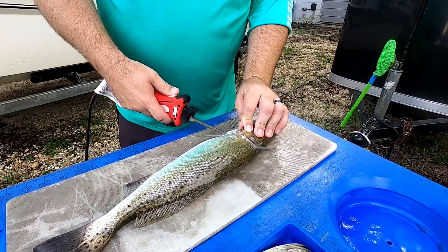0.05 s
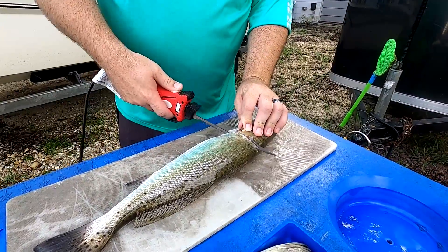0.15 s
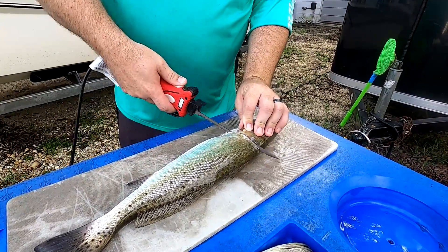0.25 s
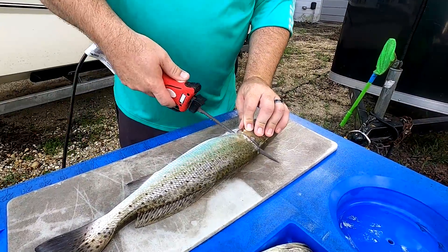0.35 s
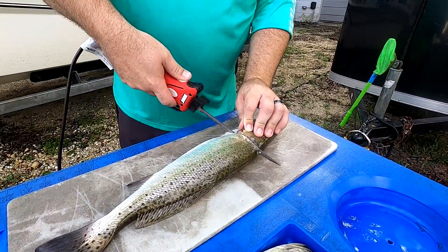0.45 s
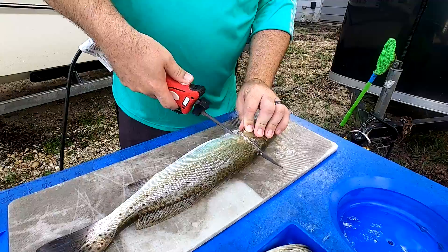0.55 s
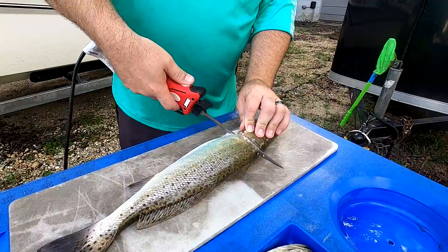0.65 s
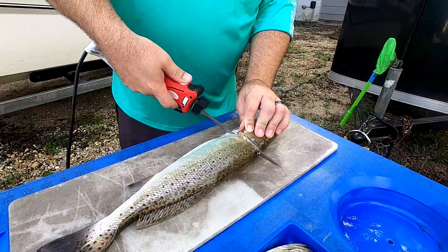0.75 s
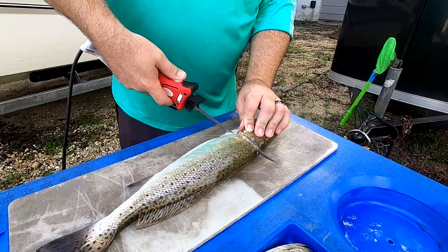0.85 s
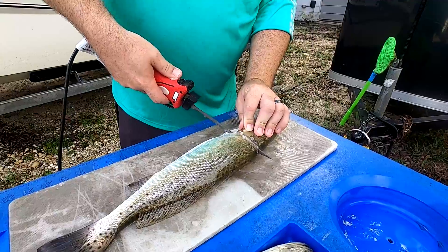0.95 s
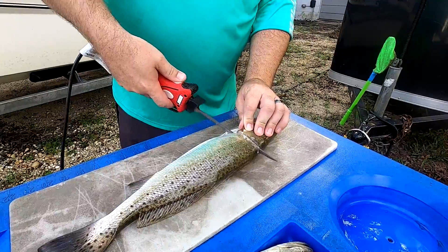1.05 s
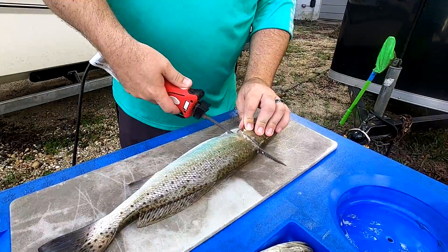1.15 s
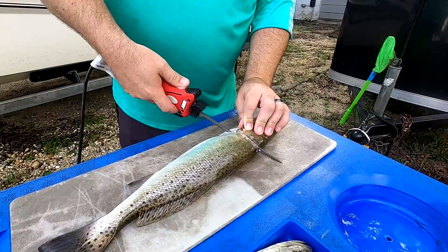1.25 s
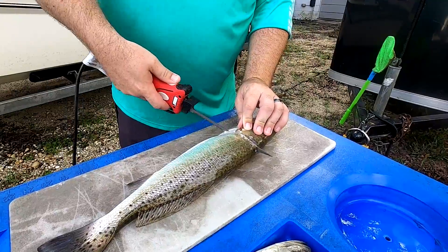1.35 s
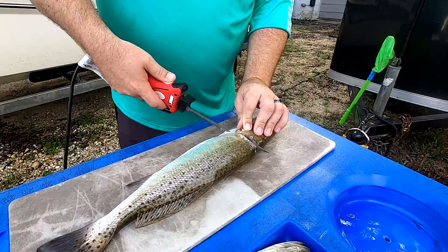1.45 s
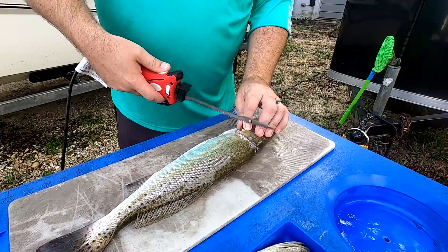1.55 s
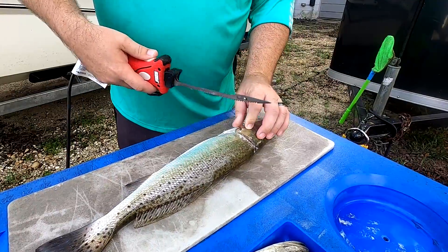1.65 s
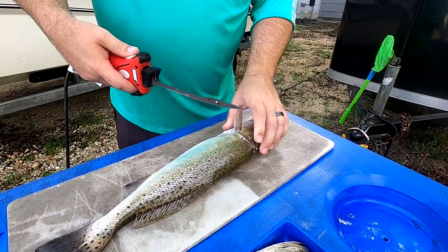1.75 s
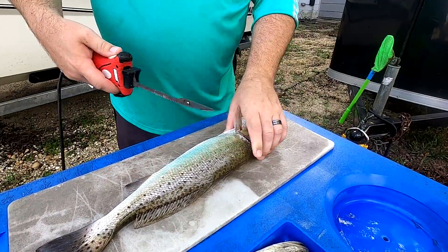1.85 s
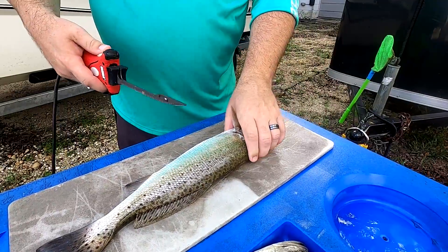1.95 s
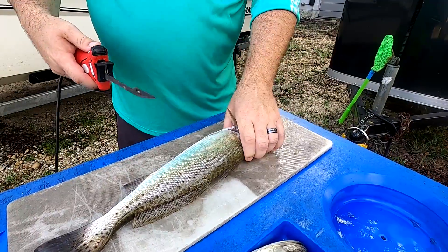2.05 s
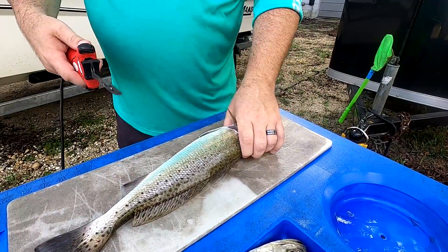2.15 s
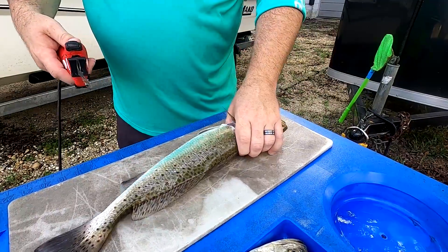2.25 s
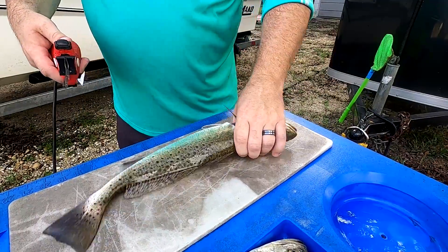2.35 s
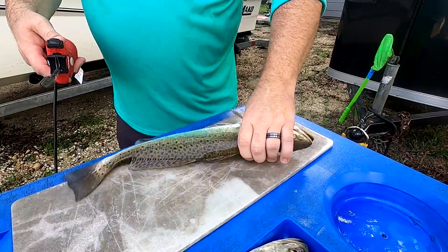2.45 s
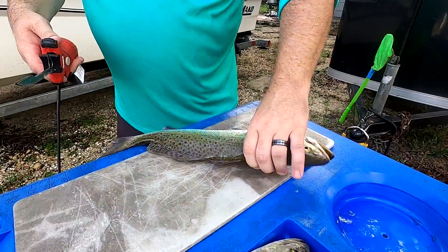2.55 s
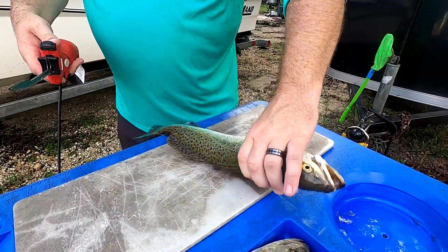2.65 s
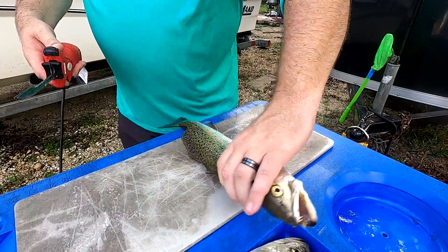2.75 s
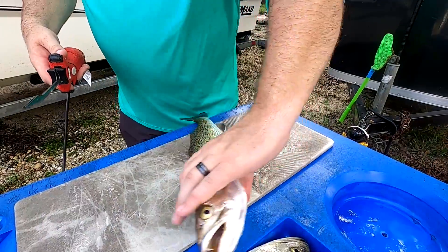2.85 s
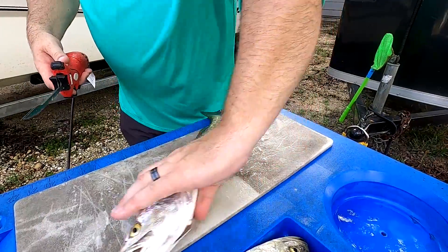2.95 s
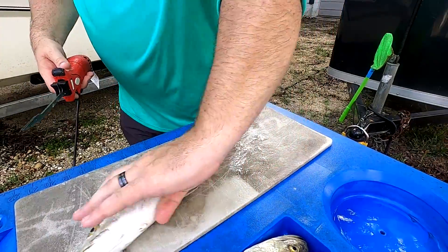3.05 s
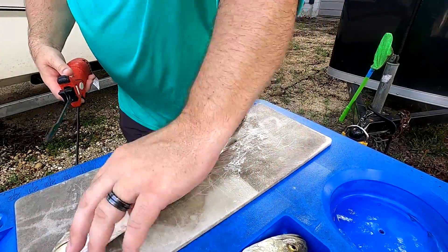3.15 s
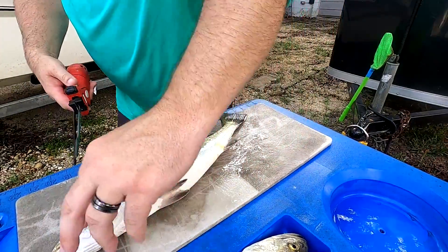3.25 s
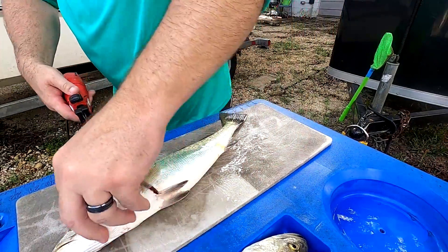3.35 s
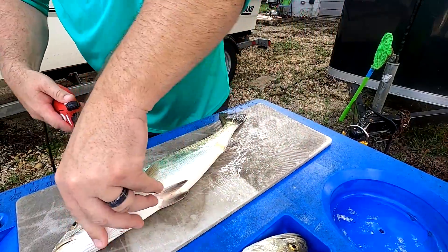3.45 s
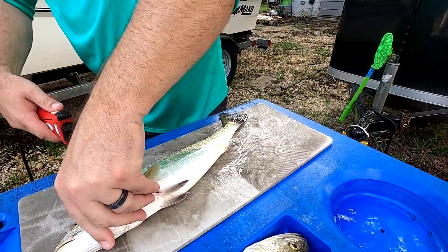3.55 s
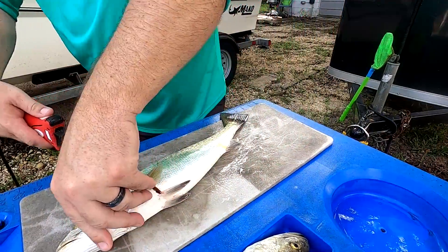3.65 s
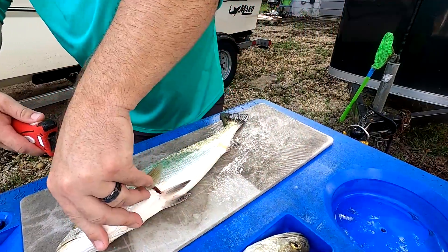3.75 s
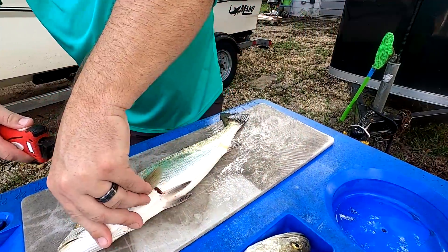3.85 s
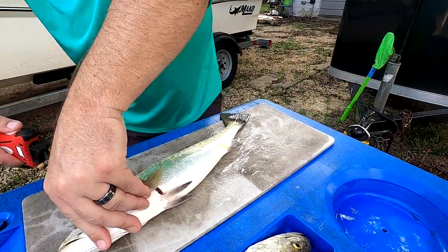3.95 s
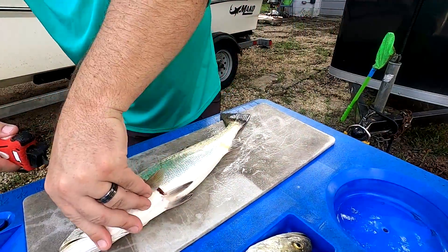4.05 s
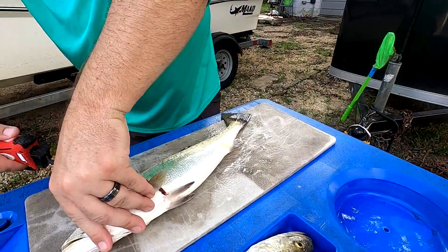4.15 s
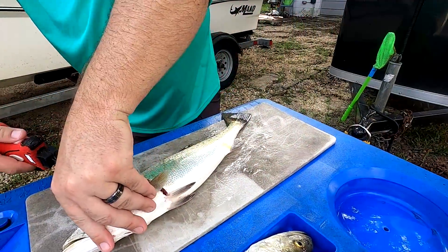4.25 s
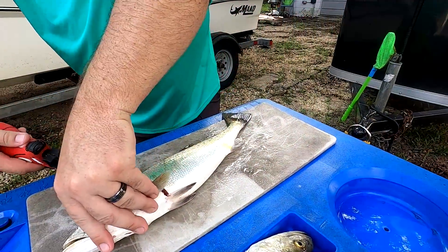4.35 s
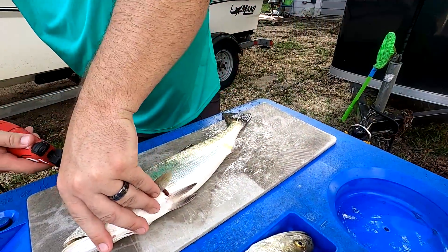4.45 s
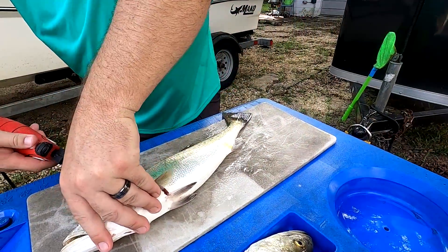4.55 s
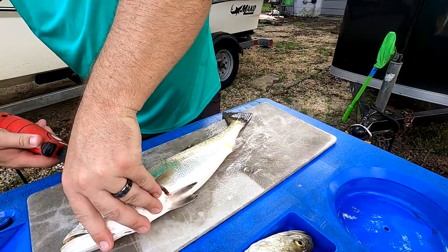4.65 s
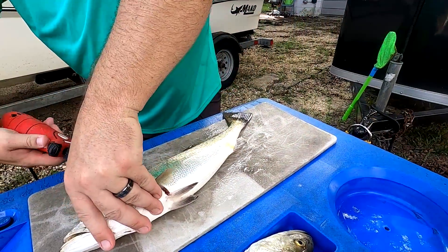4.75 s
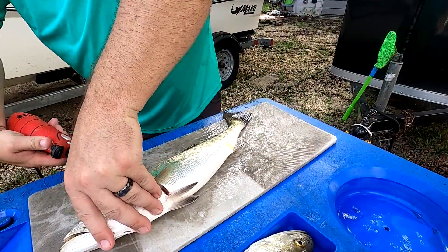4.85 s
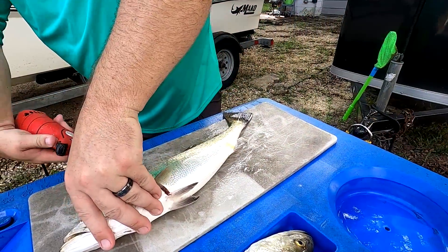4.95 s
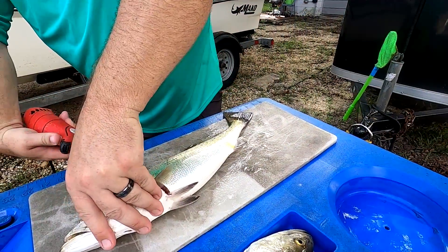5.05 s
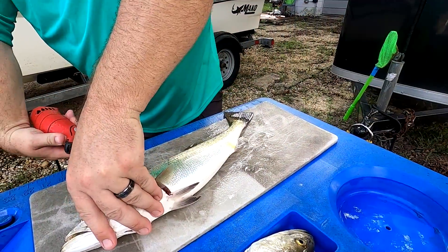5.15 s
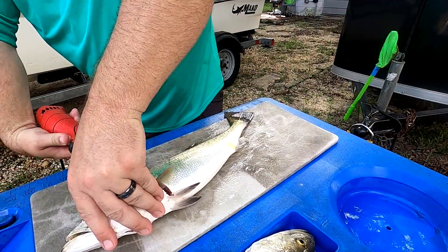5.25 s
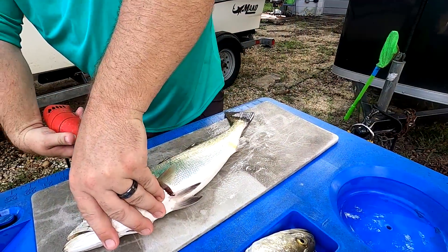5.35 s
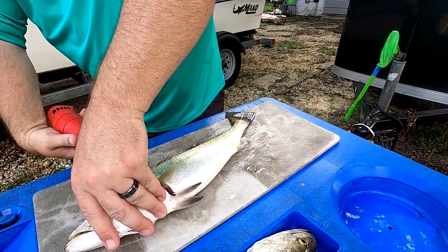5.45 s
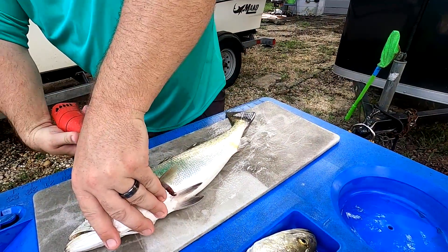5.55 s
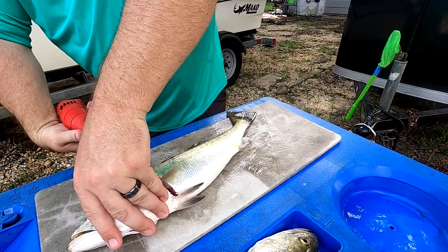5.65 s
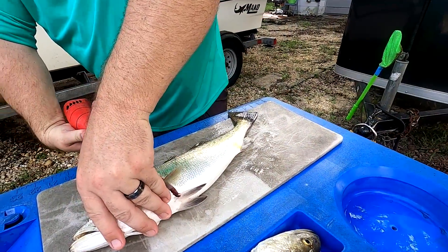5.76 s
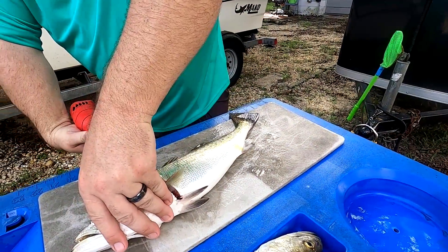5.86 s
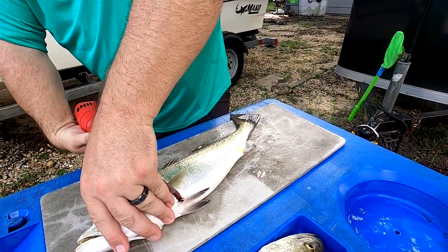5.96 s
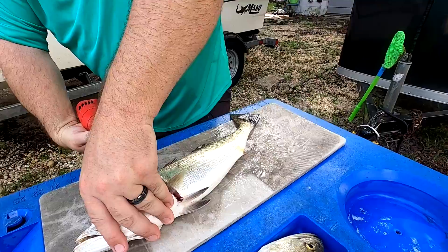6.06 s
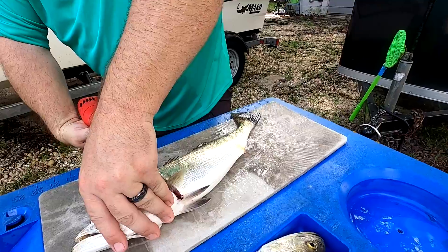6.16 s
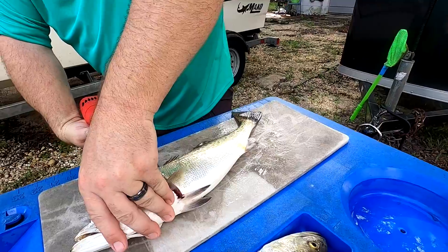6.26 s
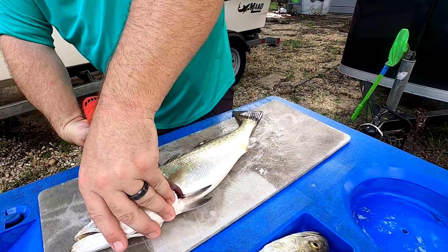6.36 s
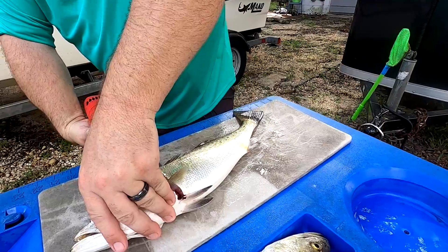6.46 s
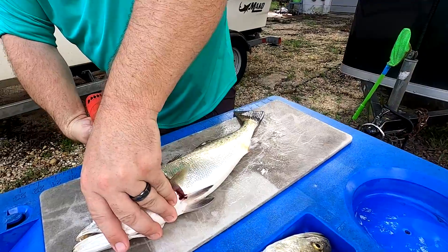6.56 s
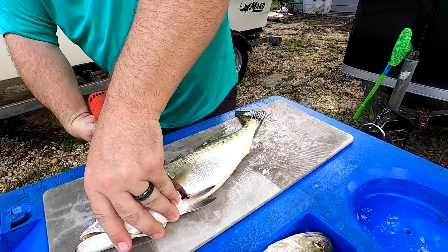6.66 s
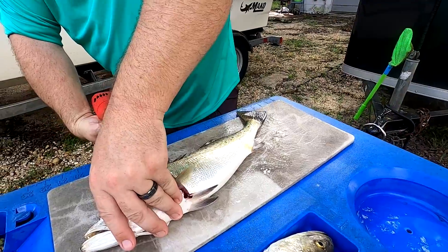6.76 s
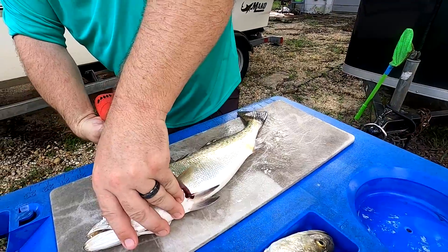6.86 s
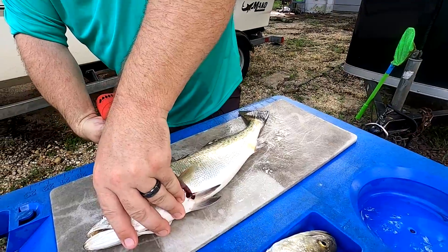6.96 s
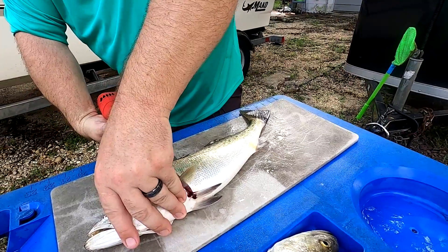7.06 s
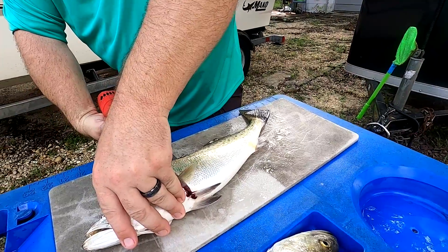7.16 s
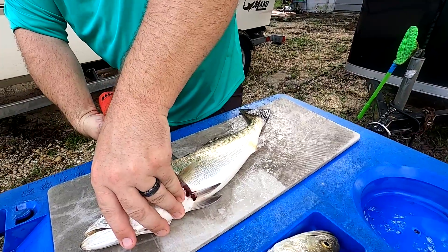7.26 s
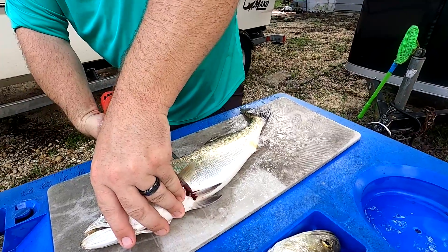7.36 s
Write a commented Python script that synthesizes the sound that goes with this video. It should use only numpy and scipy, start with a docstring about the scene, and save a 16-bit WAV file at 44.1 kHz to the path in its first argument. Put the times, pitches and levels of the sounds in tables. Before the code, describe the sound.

Buzzing electric knife cuts outdoors, winds down to separate clicks, a soft wet thud follows in light wind, then the buzz snaps back on.

```python
"""Outdoors, an electric fillet knife runs over a board, in light wind with a far wash behind it.
A motor whines through a gear and crank that shuttles two blades; they rattle, scrape and clack.
It cuts, coasts to a stop with slowing clacks, the fish is turned and flops on the board, then it restarts.
Gear and crank sounds follow one speed curve; clacks and thuds are dying tones; wind and wash are shaped noise.
A small stereo camera listens."""
import sys
import numpy as np
from scipy import signal
from scipy.fft import rfft, irfft
from scipy.io import wavfile
from scipy.ndimage import uniform_filter1d

SR = 44100
rng = np.random.default_rng(int(sys.argv[2]) if len(sys.argv) > 2 else 0)


def put_to_file(sound):
    """Save the sound as 16-bit audio at rate SR, in the file named by the first command-line argument."""
    columns = np.atleast_2d(sound).T  # one column per channel
    safe = np.clip(columns, -1, 1)
    whole_steps = np.round(safe * 32767)
    wavfile.write(sys.argv[1], SR, whole_steps.astype(np.int16))


def boost(x):
    """Linear amplitude factor 10**(x/20) for a level x in decibels (scalar or array-like)."""
    u = np.asarray(x, float) / 20
    return 10 ** u


N = 326779
T = np.arange(N) / SR


def evened(x):
    """Scales a sound to rms 1."""
    return x / np.sqrt(np.mean(x ** 2) + 1e-20)


def smooth_noise(size, *spans):
    """Slowly wandering noise of rms 1, averaged over each span of samples in turn."""
    x = rng.standard_normal(size)
    for span in spans:
        x = uniform_filter1d(x, span)
    return evened(x)


def read(points, hz):
    """Reads a table of pitches and values, evenly by octave."""
    f, value = np.transpose(points)
    return np.interp(np.log(hz + 1), np.log(f + 1), value)


def follow(points, t):
    """Reads each column of a table of times and values."""
    s, *columns = np.transpose(points)
    return [np.interp(t, s, column) for column in columns]


def colour(x, points, lo_hz=0, hi_hz=SR):
    """Filters with the given spectrum, faded outside lo-hi; nothing sounds before its cause."""
    hz = np.abs(np.fft.fftfreq(8192, 1 / SR)) + 1
    gain = boost(read(points, hz)) / np.sqrt((1 + (lo_hz / hz) ** 8) * (1 + (hz / hi_hz) ** 8))
    log = np.log(gain + 1e-5)
    taps = np.fft.ifft(np.exp(log - 1j * signal.hilbert(log).imag)).real[:4096]
    rows = signal.oaconvolve(np.atleast_2d(x), taps[None] / np.linalg.norm(taps), axes=1)
    return rows[:, :x.shape[-1]].reshape(x.shape)


def ring(hz, t60, size=3000):
    """One dying tone, 60 dB down after t60 seconds."""
    t = np.arange(size) / SR
    return boost(-60 * t / t60) * np.sin(2 * np.pi * hz * t)


def linger(x, decay_s):
    """Lets each impulse die away exponentially."""
    return signal.lfilter([1], [1, -np.exp(-1 / SR / decay_s)], x)


def swells(t, rest_db, rows):
    """A resting gain with bell-shaped swells on it."""
    return boost(rest_db) + sum(boost(db) * np.exp(-((t - s) / width) ** 2) for s, db, width in rows)


def add(mix, s, sound, pan_db=0):
    """Places a one-channel sound in the stereo mix; pan is left minus right."""
    part = mix[:, round(s * SR):][:, :len(sound)]
    part += boost([[pan_db / 2], [-pan_db / 2]]) * sound[:part.shape[1]]


# colour of the wind noise: pitch_hz, level_db (per Hz)
WIND_COLOUR = [(7.1, -29.5), (12, -6.5), (28, 5.5), (48, 7), (70, 7.5), (90, -8), (123, -2.5), (156, -9),
               (200, -15.5), (260, -49.5), (440, -120)]
# gusts at the microphone ports: peak_s, level_db, width_s
GUSTS = [(.47, -54, 0.022), (1.48, -50, 0.022), (1.96, -46, 0.025), (2.37, -45.5, 0.05),
         (2.62, -54.5, 0.028), (3.161, -46, 0.058), (3.61, -49, 0.014), (4.79, -59, 0.024),
         (5.1, -69, 0.02), (5.29, -52, 0.24), (5.66, -50, 0.026), (6.5, -63, 0.03), (6.69, -55, 0.021),
         (7.08, -43, 0.023), (7.35, -50, 0.035)]
# one deep gust: peak_s, peak_db, pitch_hz, width_s, left_minus_right_db
DEEP_GUST = (7.034, -24, 19, .032, -7)
BREEZE_DB, LUMPS_DB = -57, -0.5  # wind between the gusts, and how much it wanders


def wind():
    """Wind buffets the ports: low noise whose level wanders and swells, nearly alike in both ears."""
    shared, unlike = rng.standard_normal((2, N))
    lumps_db = LUMPS_DB * smooth_noise(N, 2500, 2500)
    noise = colour(shared + np.outer([.16, -.16], unlike), WIND_COLOUR)
    at, peak_db, hz, width, pan_db = DEEP_GUST
    bell = np.exp(-((T - at) / width) ** 2)
    gust = bell * -np.cos(2 * np.pi * hz * (T - at))
    return swells(T, BREEZE_DB + lumps_db, GUSTS) * noise + boost(peak_db + np.outer([.5, -.5], pan_db)) * gust


# colour of the far wash: pitch_hz, level_db (per Hz)
YARD = [(53, -16.5), (90, -3), (147, -8.5), (236, -8.5), (314, -12.5), (401, -13.5), (502, -22.5),
        (838, -22.5), (1460, -21), (3040, -35.5), (5290, -42), (12000, -64), (15600, -102), (22000, -120)]
YARD_DB = -58.5


def yard():
    """The far wash of the yard: steady shaped noise, slightly different in each ear."""
    shared, unlike = rng.standard_normal((2, N))
    return boost(YARD_DB) * np.array([colour(shared + side * 0.2 * unlike, YARD) for side in (1, -1)])


# stereo balance of wind and yard: pitch_hz, left_minus_right_db
TILT = [(60, -0.5), (240, -1), (950, 1.5), (3770, 5), (15000, -19)]


def air():
    """Wind and yard together, with a left-right balance that depends on pitch."""
    tilt = boost(np.outer([.5, -.5], read(TILT, np.fft.rfftfreq(N, 1 / SR))))
    return irfft(rfft(wind() + yard()) * tilt, N)


# speed the motor settles at under load, then coasting; one table a run: time_s, gear_mesh_hz
SPEEDS = [
    [(0.0, 2940), (.17, 2961), (0.3, 2964), (0.5, 2946), (0.62, 2951), (0.8, 2942), (0.92, 2927.5),
     (1.0, 2927.5), (1.224, 2938), (1.28, 2748), (1.63, 1533), (1.7, 1313), (1.8, 1040), (2.04, 500),
     (2.14, 290), (2.33, 100)],
    [(4.395, 2945), (5.0, 2947), (5.3, 2956.5), (5.47, 2947.5), (5.62, 2948), (5.8, 2963.5), (5.92, 2963),
     (6.12, 2948.5), (6.32, 2952.5), (6.48, 2948.5), (6.66, 2933), (6.8, 2936), (7.0, 2945), (7.41, 2941)],
]
# trigger pull, one number a run (the first run is already at speed): trigger_s
TRIGGER_S = [-1, 4.39]
# crank angle at the start, one number a run: angle_turns
CRANK_START = [.045, .038]
CRANK = .012  # crank turns per gear tooth
SPIN_UP_S = .044


def spin(run):
    """Time, mesh rate and crank angle of one run: the motor climbs to its speed after the trigger."""
    s, settled = np.transpose(SPEEDS[run])
    t = np.arange(s[0], min(s[-1], N / SR), 1 / SR)
    hz = np.interp(t, s, settled) * (1 - np.exp(-(t - TRIGGER_S[run]) / SPIN_UP_S))
    return t, hz, CRANK_START[run] + CRANK * np.cumsum(hz) / SR


FULL_HZ = 2950  # gear mesh rate counted as full speed


def octaves_slower(hz):
    """How many octaves the mesh rate lies below full speed."""
    return np.log2(np.maximum(FULL_HZ / hz, 1))


TORQUE_S = 0.014


def torque(t, run):
    """The gears are pressed hard while the motor picks up, then ease off."""
    return np.exp(-(t - TRIGGER_S[run]) / TORQUE_S)


TAKE_UP_S, CATCH_S = .013, 0.0018  # slack before the gears meet; rise of the sound after that


def gears_meet(t, run):
    """Silent until the motor has taken up the slack, then a quick rise."""
    return np.clip((t - TRIGGER_S[run] - TAKE_UP_S) / CATCH_S, 0, 1)


def blows(crank, table, loose):
    """One impulse each time the crank passes a listed angle, loose in time (samples) and size."""
    luck, out = rng.standard_normal((200, len(table), 2)), np.zeros(len(crank))
    for k, (angle, db) in enumerate(table):
        at = np.flatnonzero(np.diff(np.floor(crank - angle)))
        shift = (loose * luck[:len(at), k, 0]).astype(int)
        out[np.clip(at + shift, 0, len(crank) - 1)] = boost(db + 1.6 * luck[:len(at), k, 1])
    return out


# how the hand holds and turns the knife, one table a run:
# time_s, rattle_db, whine_db, whine_left_minus_right_db, whine_left_lead_rad
GRIPS = [
    [(0.0, -27, -32, 4, -.75), (.22, -26, -32.5, 2, -0.86), (.3, -26, -26, -.6, -.63),
     (.4, -24.5, -23, 0, -0.43), (.6, -27, -21, 0.5, -0.53), (.76, -28.5, -20.5, .5, -.5),
     (.94, -26, -21.5, 0, -0.51), (1.07, -26.5, -23.5, .0, -0.38), (1.3, -27.5, -23, 2.5, -0.8),
     (1.7, -25.5, -20.5, 0, -0.1)],
    [(4.415, -23, -40, -5, -0.44), (4.435, -27, -8, 11, -.5), (4.455, -34, -19, 12, -0.69),
     (4.475, -30, -28, 5, -0.95), (4.52, -31.5, -34.5, 5, -.8), (4.54, -29, -33, 5, -.9),
     (4.56, -31.5, -45, 4.5, -1.2), (4.64, -31, -40, 5, -1), (4.68, -31, -42, 3, -1),
     (4.87, -30.5, -46, 6, -0.5), (4.9, -31.5, -36, 5, -0.56), (5.08, -31, -32.5, 4, -.45),
     (5.11, -31.5, -31, 2, -0.51), (5.25, -31.5, -30.5, 4, -.37), (5.45, -31, -28, 3, -.37),
     (5.9, -31, -25.5, 3, -0.63), (6.5, -29, -26, 1, -0.73), (7.41, -30, -28, 2.6, -0.56)],
]


def hand_grip(t, run):
    """The hand sets how loud rattle and whine are and how the whine reaches each ear."""
    return follow(GRIPS[run], t)


# the casing passes the tooth tone on best near its resonances: pitch_hz, level_db
WHINE_PATH = [(1100, -48), (1200, -24), (1320, -9.5), (1530, -16.5), (1640, -27.5), (1720, -29.5),
              (1790, -39), (2200, -35), (2400, -17.5), (2600, -11.5), (2740, 1), (2950, 0.5)]
TORQUE_WHINE_DB = 12


def tooth_whine(t, hz, teeth, run):
    """Each meeting of gear teeth is one cycle of a tone, roughened by contact and gone at low speed."""
    _, level_db, pan_db, lead = hand_grip(t, run)
    level_db = level_db + read(WHINE_PATH, hz) + TORQUE_WHINE_DB * torque(t, run)
    halves = [.5, -.5]
    tone = np.sin(2 * np.pi * teeth + np.outer(halves, lead))
    tone *= boost(level_db + np.outer(halves, pan_db))
    tone *= 1 + 0.023 * smooth_noise(len(t), 150)
    return tone * np.clip(hz / 1150, 0, 1) ** 6 * gears_meet(t, run)


# other shaft tones at full speed, one table a run: multiple_of_mesh_tone, level_db
ORDERS_DB = [
    [(.4, -52.5), (2.4, -65.5)],
    [(.4, -37.5), (.6, -51), (.8, -61), (2.4, -53)],
]
# a second tone sings while the motor climbs: multiple_of_mesh_tone, peak_s, level_db, width_s
CLIMB_TONE = (1.17, 4.51, -41, .035)


def shaft_tones(t, hz, teeth, run):
    """Shafts add tones locked to the mesh tone; they waver and fade quickly with speed."""
    waver = 1 + 0.1 * smooth_noise(len(t), 900)
    tones = sum(boost(db) * np.sin(2 * np.pi * m * teeth) for m, db in ORDERS_DB[run])
    tones = tones * waver * (hz / hz.max()) ** 8
    multiple, *swell = CLIMB_TONE
    return tones + swells(t, -120, [swell]) * waver ** 2 * np.sin(2 * np.pi * multiple * teeth)


def strands(x, depth_db):
    """Narrow casing resonances come and go under the hand, about a tenth of a second at a time."""
    z = signal.stft(x, nperseg=1024)[2]
    field = rng.standard_normal(z.shape[:0:-1]).T
    field = uniform_filter1d(field, size=2, axis=0)
    for _ in range(2):
        field = uniform_filter1d(field, size=6, axis=1)
    return signal.istft(z * boost(depth_db * evened(field)), nperseg=1024)[1][:, :x.shape[1]]


# colour of casing and blades as the hand holds them, one table a run: pitch_hz, level_db (per Hz)
BODIES = [
    [(240, -58), (400, -40), (540, -33.5), (630, -13), (737, -11.5), (808, -31), (1080, -25), (1200, -12),
     (1340, -2), (1520, -13), (1750, -21), (2170, -15), (2510, -17), (3010, -8.5), (3200, -12), (5500, -15),
     (6600, -21), (7500, -19.5), (9500, -31.5), (11200, -32.5), (15500, -61.5)],
    [(240, -81), (400, -30), (560, -22.5), (643, -11), (800, -16), (920, -11), (1020, -11), (1180, -5),
     (1350, -3), (1700, -10.5), (1930, -18.5), (2320, -11.5), (2550, -17.5), (2790, -11.5), (3010, -11.5),
     (3150, -11.5), (4410, -14), (7200, -22.5), (11600, -34), (15500, -49.5)],
]
# the palm frees or damps the casing's low band, one table a run: time_s, change_db
GROWLS = [
    [(0, -0.5), (.25, -1.5), (.5, 0), (.7, 0), (.85, 2.5), (1.1, -0.5), (1.3, -2), (1.7, 1.5)],
    [(4.4, 2.2), (4.6, 2.6), (5, 0), (6, 0), (7.41, 0.32)],
]
GROWL_HZ = 950  # upper edge of that low band
KNOCK_DB, REPEAT = -9, 0.54  # knocks over tooth noise; how alike successive turns are (0-1)
RATTLE_DB_PER_OCT, RATTLE_BEND = -17, 1.37  # loss at one octave below full speed; how it bends beyond
WOBBLE_DB, STRANDS_DB = 0.5, 1  # unsteady hand; depth of the changing resonances


def casing_rattle(t, hz, crank, thumps, run):
    """Worn teeth and crank knocks shake the casing; the same teeth meet every turn."""
    wear = rng.standard_normal((2, 1250))[:, (crank % 1 * 1250).astype(int)]
    seat = 2 * np.pi * 1.5 * t  # the seating of the teeth drifts
    worn = np.cos(seat) * wear[0] + np.sin(seat) * wear[1]
    fresh = rng.standard_normal((3, len(t)))
    uneven = boost(0.76 * smooth_noise(len(t), 60))
    contact = uneven * (REPEAT * worn + np.sqrt(1 - REPEAT ** 2) * fresh)
    rattle = colour(contact + boost(KNOCK_DB) * evened(thumps), BODIES[run], hi_hz=2380)
    rattle = strands(rattle, STRANDS_DB)
    low = signal.sosfiltfilt(signal.butter(4, GROWL_HZ, fs=SR, output="sos"), rattle)
    growl_db, = follow(GROWLS[run], t)
    rattle = rattle + low * (boost(growl_db) - 1)
    level_db = hand_grip(t, run)[0] + WOBBLE_DB * smooth_noise(len(t), 1800, 1800)
    level_db = level_db + RATTLE_DB_PER_OCT * octaves_slower(hz) ** RATTLE_BEND
    return boost(level_db) * evened(rattle)


# blade clacks in one crank turn: angle_turns, level_db
KNOCKS = [(.875, 0), (.38, -4), (.03, -13), (.53, -14)]
CRANK_CLACKS_END = 1.355  # from this second the coasting clacks stand apart
ENTER_S = 5.1  # after the restart the back stroke clacks harder until the blades enter the fish


def blades_free(t, run):
    """True after the restart until the blades enter the fish."""
    return (run == 1) & (t < ENTER_S)


def blade_impulses(t, crank, run):
    """Impulses where the crank makes the blades clack; half a turn off while they are free."""
    free = blows(crank + .5, KNOCKS, loose=2.4)
    cutting = blows(crank, KNOCKS, loose=4.8)
    return np.where(blades_free(t, run), free, cutting) * ((t < CRANK_CLACKS_END) | (run == 1))


# ringing tones of the blades: pitch_hz, level_db, t60_s
BLADE = [(5422, 4.5, 0.013), (5740, 0, 0.019), (4560, -4, 0.01006), (2330, 8, 0.017), (2690, 1.5, 0.029),
         (3906, -6.5, 0.0093), (7020, -7.5, 0.012), (7600, -13, 0.012), (8180, -8, 0.012),
         (9850, -11.5, 0.0099), (11300, -23.5, 0.0076)]
# flesh and grip lower the blade tones, one table a run: time_s, share_of_free_pitch, ring_over_hiss_db
LOADS = [
    [(0, .9, -11), (.3, .88, -12), (.6, 0.78, -12.5), (.9, .8, -10), (1.3, 0.77, -19.5)],
    [(4.43, 0.81, -19), (4.45, 0.92, -8.5), (4.53, .9, -6.5), (4.65, 0.89, -8), (4.68, 0.76, -9),
     (4.75, .92, -10.5), (4.81, .78, -5), (4.86, 0.92, -10), (5.1, 0.86, -10), (5.3, .82, -10),
     (5.65, .8, -7.5), (5.9, 0.665, -10), (6.2, 0.78, -10.5), (6.45, 0.71, -10), (6.9, 0.753, -12),
     (7.41, 0.88, -12)],
]
SHARES = np.linspace(.6, 1, 9)  # blade tunings that the load blends between


def blade_ring(t, clacks, run):
    """Each clack rings the high blade tones, lowered by the load; the cut damps the low ones."""
    high = [mode for mode in BLADE if mode[0] > 5000]
    steel = np.array([sum(boost(db) * ring(f * share, t60) for f, db, t60 in high) for share in SHARES])
    steel *= np.minimum(np.arange(steel.shape[1]) / SR / .0005, 1)  # the blow is not instant
    share, ring_db = follow(LOADS[run], t)
    share = share + .015 * rng.standard_normal(len(t))
    blend = np.maximum(1 - abs(share - SHARES[:, None]) / (SHARES[1] - SHARES[0]), 0)
    rung = signal.oaconvolve(blend * clacks, steel, axes=1).sum(0)[:len(t)]
    return boost(ring_db) * evened(rung)


# the blade tips slap together, one table a run: angle_turns, level_db
SNAPS = [
    [(.38, 0), (.03, -4)],
    [(.03, 0), (.53, -12)],
]
SNAP_DB, SNAP_S, SNAP_HZ = -17, .0012, 6000  # level over hiss; decay; lower edge


def tip_slaps(t, crank, fast, run):
    """Tip slaps are brief bursts of treble noise, absent while the blades run free."""
    slaps = linger(blows(crank, SNAPS[run], loose=6), SNAP_S) * fast * ~blades_free(t, run)
    return boost(SNAP_DB) * evened(colour(rng.standard_normal((3, len(t))) * slaps, BODIES[run], lo_hz=SNAP_HZ))


# colour of the slow blades: pitch_hz, level_db (per Hz)
COAST = [(1000, -58.5), (1700, -32.5), (2200, 2.5), (2510, -5), (2860, 1), (3400, -16.5), (4040, -8),
         (5850, -7), (6600, -15), (7500, -5.5), (8320, -13), (10500, -14.5), (11300, -12), (12000, -22),
         (14000, -36)]
# hiss level at full speed, one number a run: level_db
HISS_DB = [-32.5, -33]
HISS_DB_PER_OCT, TORQUE_HISS_DB = -8.5, 9.5  # change per octave below full speed; boost at pick-up
CLACK_DB, DRAG_GRAIN_DB = -30, 2.5  # clack bursts against steady scrape; slow blades drag in grains


def blade_hiss(t, hz, crank, run):
    """Blades scrape on each other as noise, chatter after each clack, ring, and slap at the tips."""
    clacks = blade_impulses(t, crank, run)
    chatter, burst = linger(clacks, 0.0024), linger(clacks, 0.00051)
    scrape = rng.standard_normal((3, len(t))) * (1 + 1.3 * chatter + boost(CLACK_DB) * evened(burst))
    fast = np.clip(hz / 2400, 0, 1) ** 2 if run == 0 else 1  # coasting blades only ring their own tones
    drag = boost(DRAG_GRAIN_DB * smooth_noise(len(t), 200))
    hiss = fast * colour(scrape, BODIES[run], lo_hz=2640) + (1 - fast) * colour(scrape * drag, COAST)
    hiss = evened(hiss) + blade_ring(t, clacks, run)
    hiss = hiss + tip_slaps(t, crank, fast, run)
    level_db = HISS_DB[run] + HISS_DB_PER_OCT * octaves_slower(hz) + TORQUE_HISS_DB * torque(t, run)
    return boost(level_db) * evened(hiss)


# colour of the shaken board: pitch_hz, level_db (per Hz)
BOARD = [(50, -21.5), (70, -6), (100, -2), (145, -1), (190, -3), (290, -1.5), (360, -2), (430, -13.5),
         (560, -6), (900, -64)]
# swells of the board's thrum, at the restart, sawing strokes and run-down: peak_s, level_db, width_s
THRUM_SWELLS = [(0.058, -42.5, 0.024), (.85, -54, .1), (1.03, -45, 0.08), (1.21, -37, 0.035),
                (1.45, -51, 0.073), (4.47, -53, 0.08), (4.85, -55, .05), (5.12, -54, 0.11),
                (5.57, -47, 0.1), (6.08, -51.5, 0.095), (6.53, -49.5, 0.075)]
# how much of the thrum is crank beat, one number a run: share (0-1)
THRUM_SHARES = [0.26, 0.56]
THRUM_DB = -58.5  # board between the swells, at full speed


def board_thrum(t, hz, thumps, run):
    """The board hums low with crank knocks and noise, and swells at listed times."""
    beat = THRUM_SHARES[run]
    thrum = colour(beat * evened(thumps) + (1 - beat) * rng.standard_normal(len(t)), BOARD)
    rest_db = THRUM_DB + HISS_DB_PER_OCT * octaves_slower(hz)
    return swells(t, rest_db, THRUM_SWELLS) * evened(thrum)


# likeness of the two ears: pitch_hz, likeness (0-1)
SAME = [(100, 0.99), (600, 1), (1500, 1), (4000, 0.65), (7000, 0.75), (12000, 0.65)]
# how far the left ear leads, one table a run: pitch_hz, lead_rad
LEADS = [
    [(0, 0.06), (6550, 0.3), (8790, -0.06), (10900, -0.7), (12800, 0.01), (15200, -0.4)],
    [(0, 0.051), (2580, -0.28), (6460, 1), (8610, 0.68), (9990, 0.58), (15200, -0.1)],
]
# stereo balance of the knife, one table a run: pitch_hz, left_minus_right_db
SIDES = [
    [(60, -1.5), (1000, -0.5), (3800, -0.5), (12000, -6)],
    [(60, -1), (1000, -1), (3000, 6), (5000, -2.5), (12000, -1)],
]


def ports(mid, stray, run):
    """Two microphone ports: a phase lead, a balance, and treble that reaches each by its own path."""
    hz = np.fft.rfftfreq(len(mid), 1 / SR)
    same = np.sqrt(np.clip(read(SAME, hz), 0, 1))
    turn = np.exp(.5j * np.outer([1, -1], read(LEADS[run], hz)))
    turn = turn * boost(np.outer([.5, -.5], read(SIDES[run], hz)))
    return irfft(turn * (same * rfft(mid) + np.sqrt(1 - same ** 2) * rfft(stray)), len(mid))


# casing knocks as the blades reverse: angle_turns, level_db
THUMPS = [(0.313, -8.5), (0.817, -7)]
DRAG_HZ = 620  # the noise fades out over this span of mesh rates, down to 100 Hz


def knife(run):
    """One run: whine, shaft tones, rattle, hiss and board thrum, all locked to the motor's speed."""
    t, hz, crank = spin(run)
    teeth = np.cumsum(hz) / SR
    thumps = blows(crank, THUMPS, loose=6.0)
    noise = casing_rattle(t, hz, crank, thumps, run) + blade_hiss(t, hz, crank, run)
    noise = noise + board_thrum(t, hz, thumps, run)
    noise *= gears_meet(t, run) * np.clip((hz - 100) / DRAG_HZ, 0, 1)
    tones = np.sqrt(2) * shaft_tones(t, hz, teeth, run)
    out = ports(noise[0] + tones, noise[1:], run) + np.sqrt(2) * tooth_whine(t, hz, teeth, run)
    return t[0], out * signal.windows.tukey(len(t), .002)


# the last slow clacks while coasting, and the trigger:
# start_s, peak_db, low_tones_db, middle_tones_db, high_tones_db
CLACKS = [(1.597, -26, -18.5, 6.5, 4.5), (1.6198, -21.5, -31.5, -1, -4), (1.6486, -20, -23, 8, -1.5),
          (1.677, -22.5, -18, 4.5, -1.5), (1.7097, -26.5, -17.5, 8.5, 3), (1.743, -23, -1, 2, 7.5),
          (1.779, -27, -1, 2.5, 4.5), (1.8187, -18.5, -15.5, 0.5, 3.5), (1.848, -37, -1.5, -4, 1.5),
          (1.862, -30, -15.5, 6, -1.5), (1.895, -39.5, 0.5, -1.5, 1.5), (1.9104, -19, -16, -14.5, 3.5),
          (1.9659, -42, -12, -3, 3), (2.0373, -28.5, -25, -15, -3.5), (4.408, -29, -9, 10, -6)]
LISTED_FROM = 1.585  # from this second the clacks are listed one by one
# faster coasting clacks: peak, spread, low tones, and middle tones of every second clack (dB)
APART_DB, APART_SPREAD_DB, APART_LOW_DB, BACK_MID_DB = -31.5, 2.5, -12, 8
CLACK_PAN_DB = -6


def coasting_clacks():
    """Before the listed clacks there is one at each blade reversal; back strokes ring lower."""
    t, _, crank = spin(0)
    turns = t[np.flatnonzero(np.diff(np.floor(2 * (crank - KNOCKS[0][0]))))]
    turns = turns[(turns > CRANK_CLACKS_END) & (turns < LISTED_FROM)]
    rows = []
    for k, s in enumerate(turns):
        a, b = APART_SPREAD_DB * rng.standard_normal(2)
        rows.append((s, APART_DB + a, APART_LOW_DB + b, BACK_MID_DB * (k % 2), 0))
    return rows


def clacks(mix):
    """Each clack rings the blade tones briefly, with a dull crack of noise."""
    t = np.arange(3000) / SR
    for s, db, low_db, mid_db, high_db in coasting_clacks() + CLACKS:
        sound = np.zeros(3000)
        for f, mode_db, t60 in BLADE:
            a, b = rng.standard_normal(2)
            band_db = low_db * (f < 3000) + mid_db * (3000 < f < 5000) + high_db * (f > 6500)
            sound += boost(mode_db + 3 * a + band_db) * ring(f * (1 + .015 * b), t60)
        crack = rng.standard_normal(3000) * boost(-60 * t / 0.02)
        sound += 0.22 * boost(high_db) * colour(crack, COAST)
        sound *= np.minimum(t / 0.00035, 1)
        add(mix, s, boost(db) * sound / abs(sound).max(), CLACK_PAN_DB)


# small wet ticks while the fish is handled: start_s, peak_db, pitch_hz
TICKS = [(2.356, -64, 8500), (2.4054, -63.5, 3000), (2.5298, -62, 3980), (2.6973, -58.5, 2300),
         (2.6985, -56, 1300), (2.699, -59, 4500), (2.705, -61, 6500), (3.254, -62.5, 8100),
         (3.3994, -68, 5000), (3.543, -66.5, 6340), (3.5962, -67.5, 5080), (3.6912, -55, 5230),
         (3.8247, -64.5, 4800), (3.831, -65, 7000), (4.0794, -71, 7780), (4.114, -68, 5000),
         (4.133, -74.5, 10600), (4.22, -59.5, 8000), (4.2264, -58, 8200), (4.236, -51, 9190),
         (4.274, -58, 9950), (4.3076, -66.5, 10300)]


def wet_ticks(mix):
    """Each tick is a dying grain of noise around one pitch."""
    for s, db, hz in TICKS:
        grain = rng.standard_normal(500) * boost(-60 * np.arange(500) / SR / 0.0098)
        band = signal.butter(2, [hz * 0.9, min(hz * 1.2, 15000)], "band", fs=SR, output="sos")
        grain = signal.sosfilt(band, grain)
        add(mix, s, boost(db) * grain / abs(grain).max(), -1.5)


# wet skin sliding and smacking on the board: start_s, rise_s, hold_s, fall_s, level_db, graininess_db
SLIDES = [(2.57, 0.044, 0.072, .04, -66.5, 2.3), (3.133, 0.0042, .01, 0.022, -61, 4.5),
          (3.139, 0.012, 0.014, 0.075, -55, 5.4), (3.969, 0.15, 0.21, 0.12, -72, 1.5)]
# colour of the sliding skin: pitch_hz, level_db (per Hz)
SLIDE_COLOUR = [(290, -18), (500, -3), (1190, 0), (2740, -3.5), (3620, -7), (3990, -9), (8480, -14),
                (11700, -18), (14000, -49)]
SLIDE_EDGE_DB = -20  # level at each end of a slide, against its hold


def skin_slides(mix):
    """Skin rubbing on the board is grainy noise that rises, holds and falls."""
    for *shape, top_db, grain_db in SLIDES:
        s, db = np.cumsum(shape), top_db + SLIDE_EDGE_DB * np.array([1, 0, 0, 1])
        t = np.arange(s[0], s[-1], 1 / SR)
        grains = rng.standard_normal(len(t)) * boost(grain_db * smooth_noise(len(t), 80))
        add(mix, s[0], boost(np.interp(t, s, db)) * colour(evened(grains), SLIDE_COLOUR), -1.5)


# the fish lands in several blows: start_s, thud_db, thud_hz, board_ring_db
FLOPS = [(3.14, -17, 262, -49), (3.145, -24.5, 140, -59), (3.151, -48, 228, -33.5),
         (3.163, -17.5, 125, -42), (3.168, -29.5, 260, -55), (3.183, -30, 200, -43), (3.194, -26, 130, -55),
         (3.228, -30.5, 100, -62), (3.24, -50, 150, -49), (3.306, -37, 170, -57)]
# ringing tones of the board: pitch_hz, level_db, t60_s
BOARD_RING = [(520, -5.5, 0.028), (1070, -4, 0.058), (1580, -9.5, 0.041)]
THUD_S = 0.028  # t60 of a thud


def fish_flops(mix):
    """Each blow is a soft low thud that also rings the board."""
    board = sum(boost(db) * ring(hz, t60, size=6000) for hz, db, t60 in BOARD_RING)
    soft_start = np.minimum(np.arange(6000) / SR / 0.0016, 1)
    for s, db, hz, ring_db in FLOPS:
        blow = boost(db) * ring(hz, THUD_S, size=6000) + boost(ring_db) * board
        add(mix, s, blow * soft_start, -1)


# bands of noise: a wet slap, squeaks, and a casing resonance at the restart:
# start_s, end_s, pitch_hz, half_width_hz, level_db (before the fade)
NOISE_BANDS = [(3.149, 3.2, 3600, 1500, -64), (3.301, 3.401, 4690, 110, -72.5),
               (3.303, 3.35, 4260, 130, -74), (3.308, 3.387, 2700, 250, -74), (3.305, 3.35, 940, 77, -65),
               (4.049, 4.2, 4370, 450, -88), (4.2, 4.35, 4600, 200, -82), (4.195, 4.282, 4300, 199, -80),
               (4.47, 4.9, 3260, 250, -43)]


def noise_bands(mix):
    """A wet slap, squeaks and a casing resonance: each is a band of noise that fades as it goes."""
    for start, end, hz, width_hz, db in NOISE_BANDS:
        size = round((end - start) * SR)
        band = signal.butter(2, [hz - width_hz, hz + width_hz], "band", fs=SR, output="sos")
        fade = signal.windows.tukey(size, .1) * np.linspace(1.6, .4, size)
        add(mix, start, boost(db) * evened(signal.sosfilt(band, rng.standard_normal(size))) * fade)


def scene():
    """Two runs of the knife, the pause between, and the air."""
    mix = air()
    for run in (0, 1):
        s, sound = knife(run)
        part = mix[:, round(s * SR):][:, :sound.shape[1]]
        part += sound[:, :part.shape[1]]
    clacks(mix)
    wet_ticks(mix)
    skin_slides(mix)
    fish_flops(mix)
    noise_bands(mix)
    return mix


def roll_off(x):
    """The treble ends steeply here."""
    return signal.sosfilt(signal.butter(12, 15620, fs=SR, output="sos"), x)


def record(dry):
    """The finished mix as the camera keeps it."""
    return roll_off(dry)


dry = scene()
out = record(dry)
put_to_file(out)
```